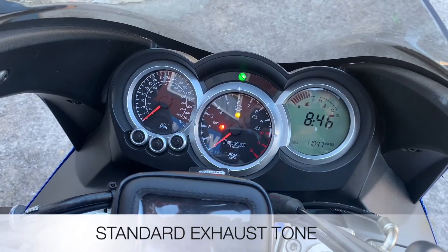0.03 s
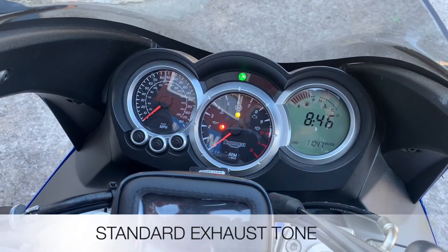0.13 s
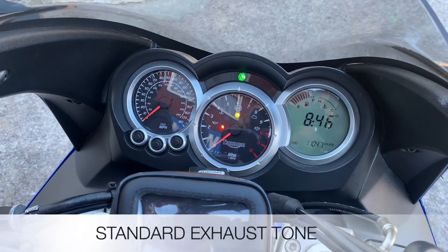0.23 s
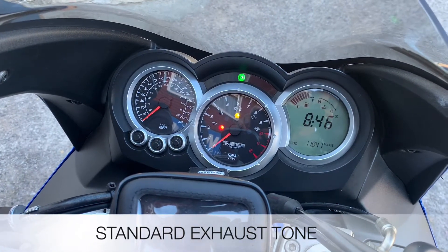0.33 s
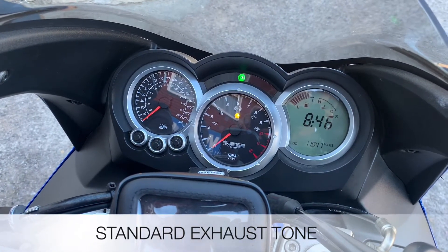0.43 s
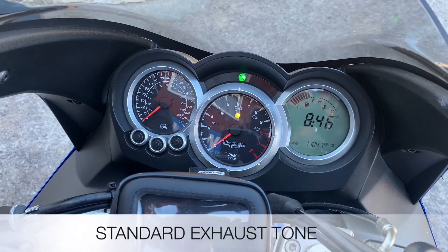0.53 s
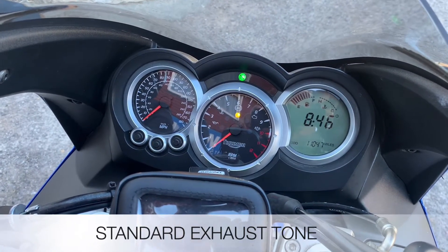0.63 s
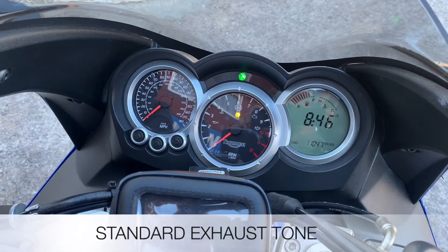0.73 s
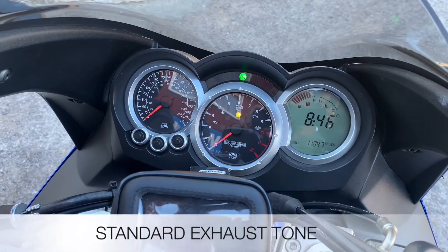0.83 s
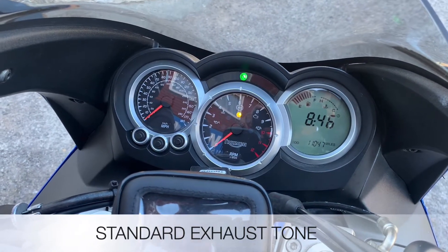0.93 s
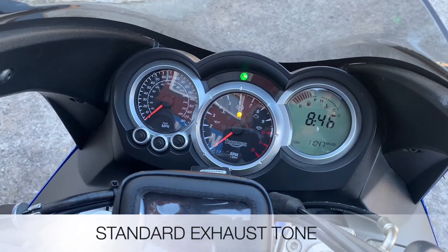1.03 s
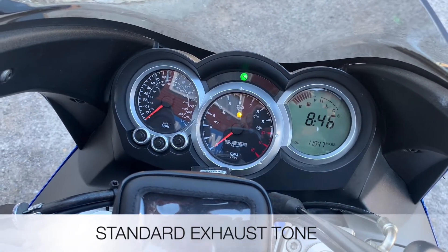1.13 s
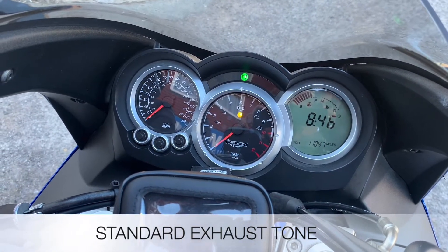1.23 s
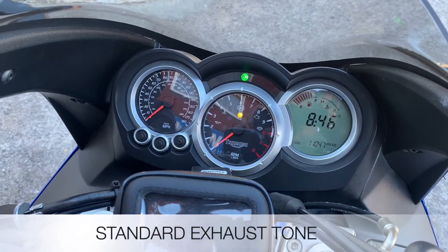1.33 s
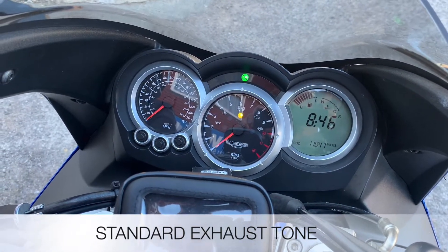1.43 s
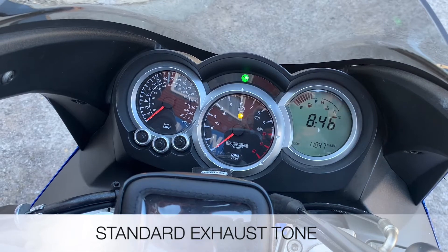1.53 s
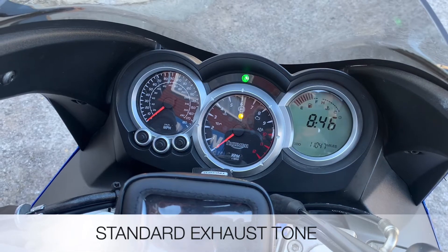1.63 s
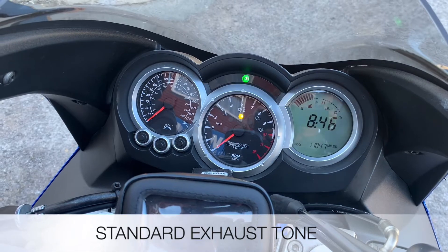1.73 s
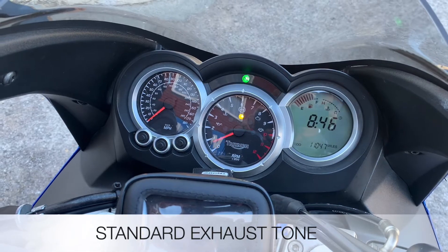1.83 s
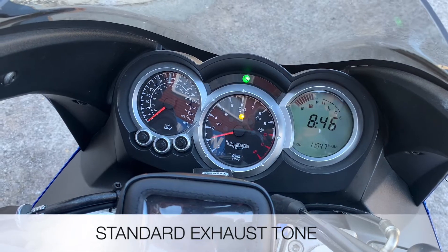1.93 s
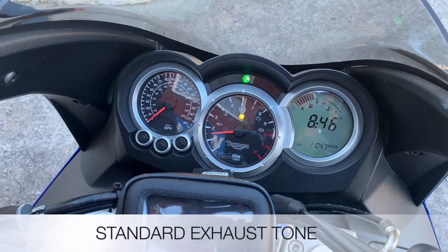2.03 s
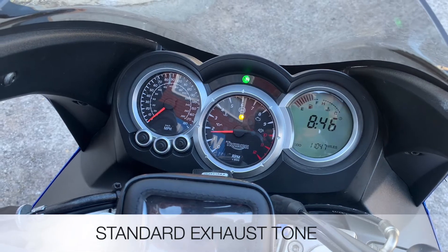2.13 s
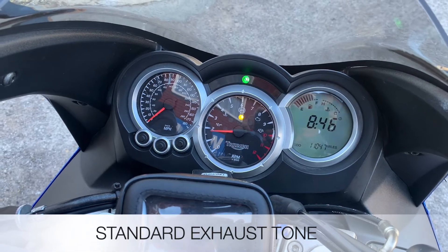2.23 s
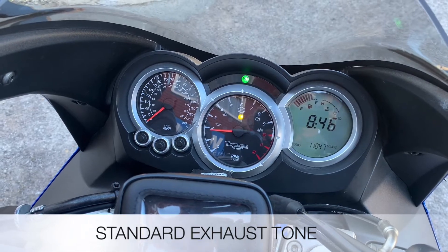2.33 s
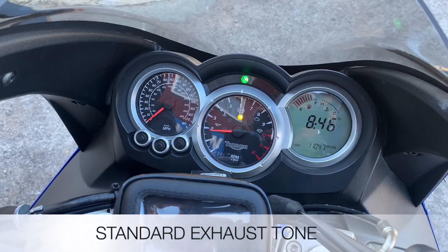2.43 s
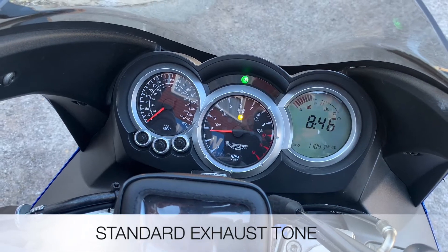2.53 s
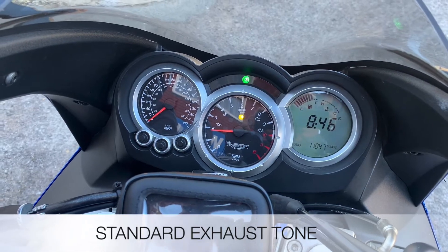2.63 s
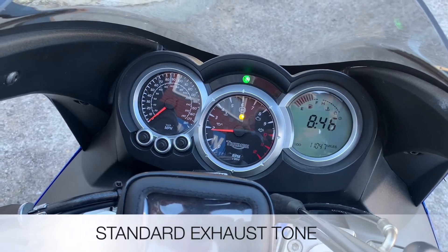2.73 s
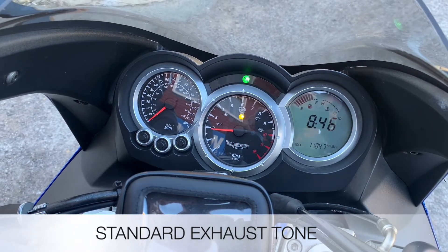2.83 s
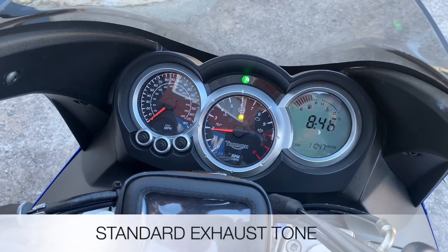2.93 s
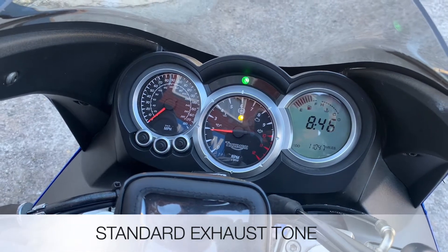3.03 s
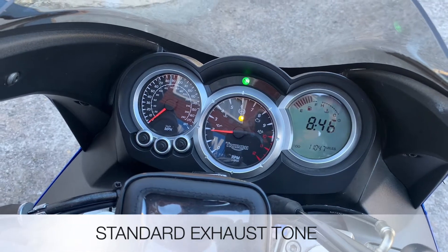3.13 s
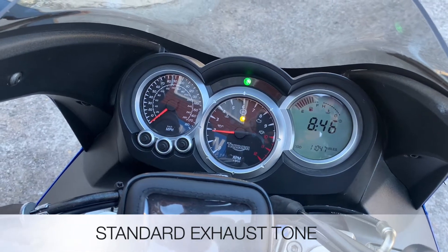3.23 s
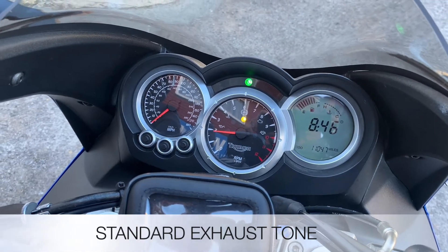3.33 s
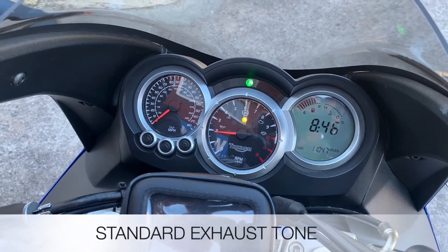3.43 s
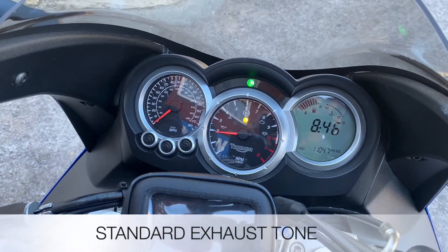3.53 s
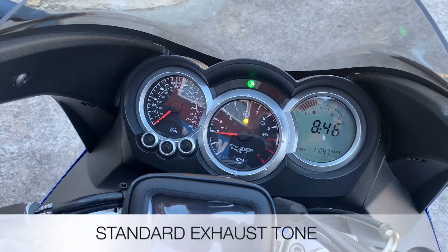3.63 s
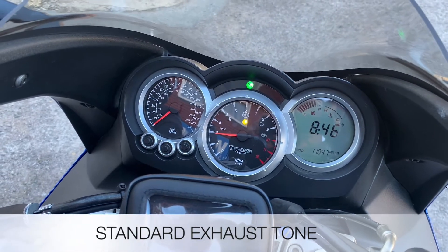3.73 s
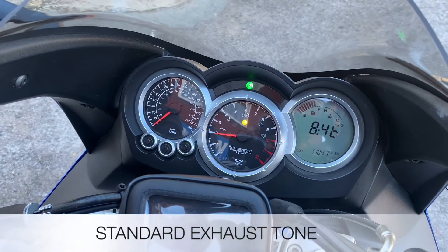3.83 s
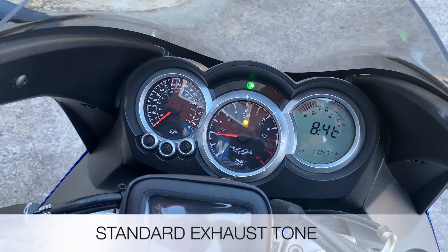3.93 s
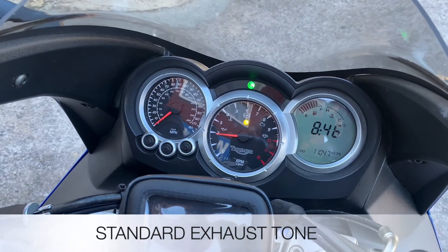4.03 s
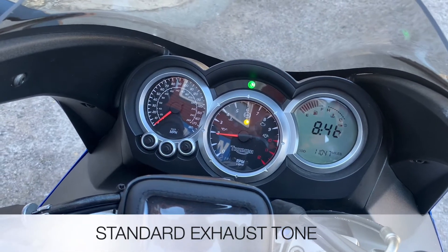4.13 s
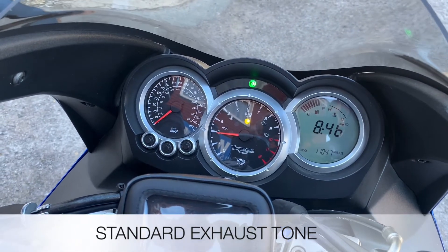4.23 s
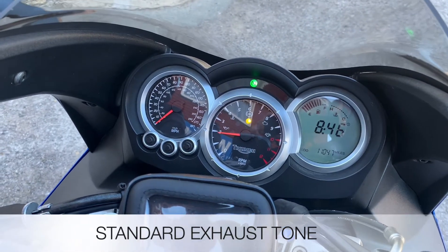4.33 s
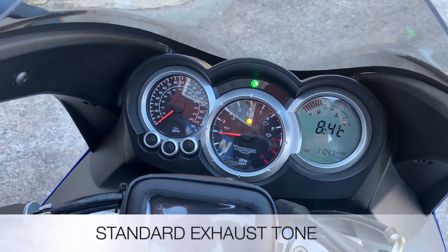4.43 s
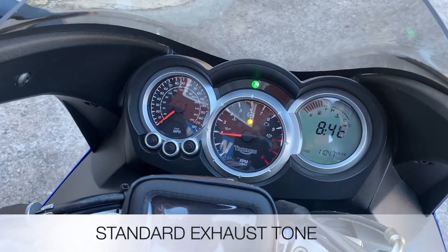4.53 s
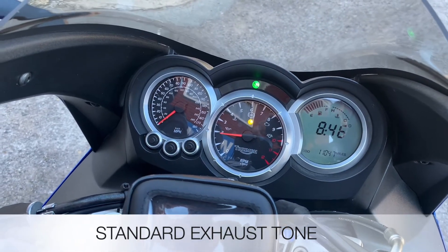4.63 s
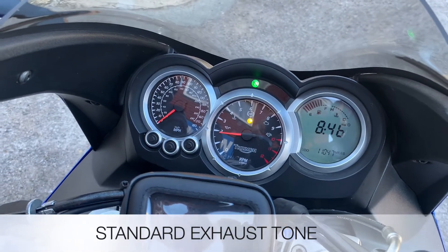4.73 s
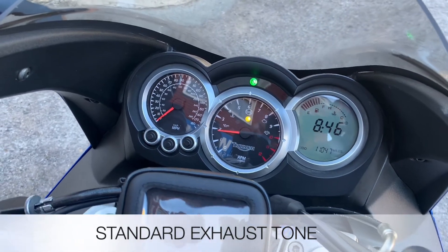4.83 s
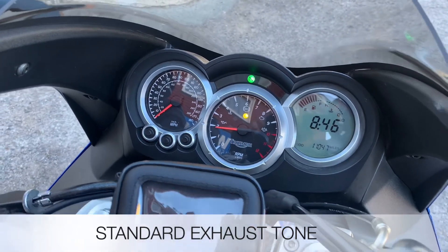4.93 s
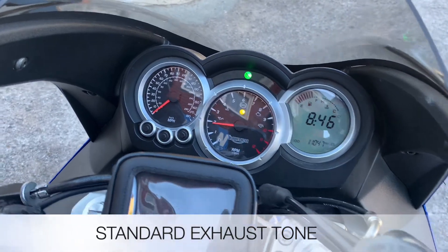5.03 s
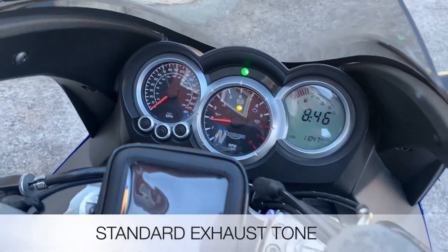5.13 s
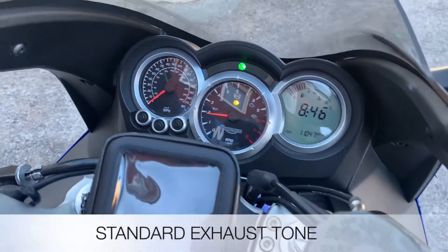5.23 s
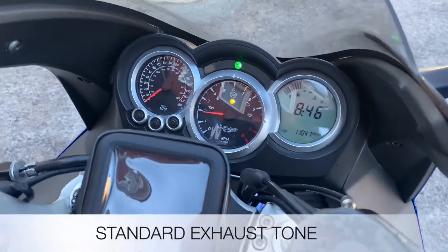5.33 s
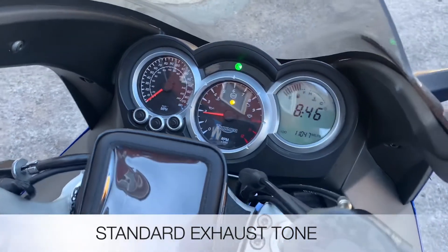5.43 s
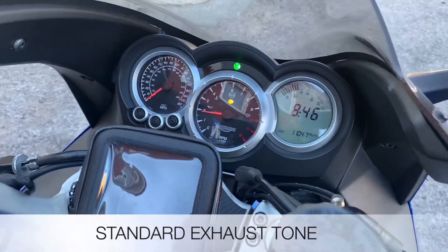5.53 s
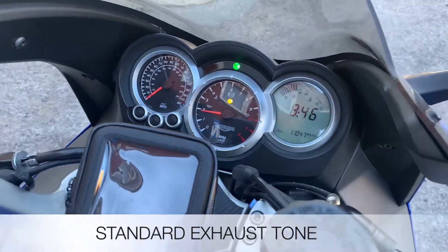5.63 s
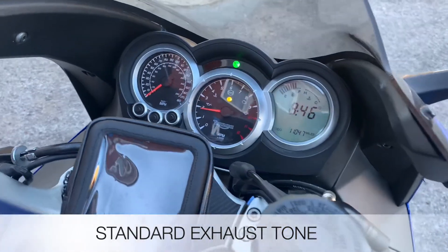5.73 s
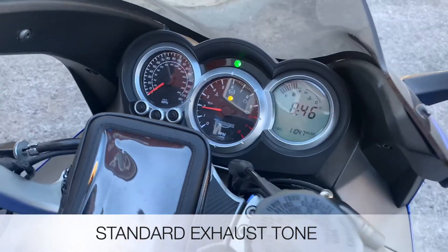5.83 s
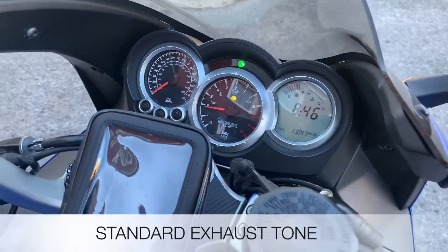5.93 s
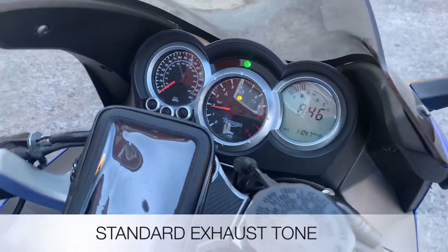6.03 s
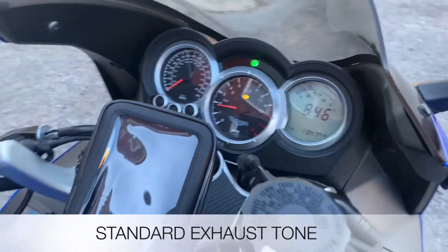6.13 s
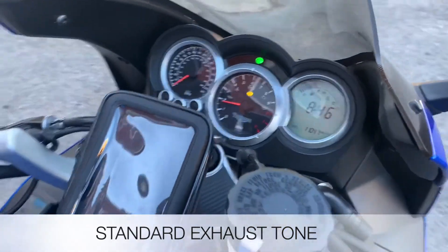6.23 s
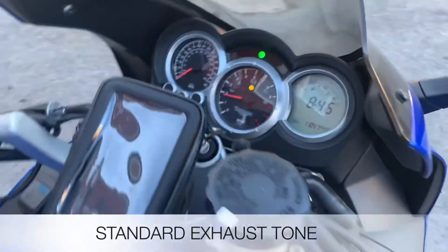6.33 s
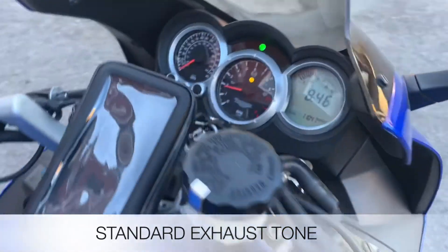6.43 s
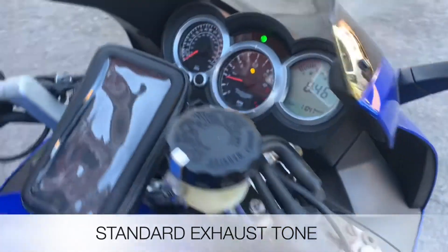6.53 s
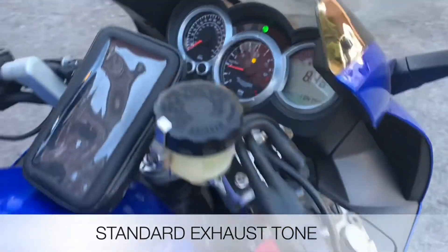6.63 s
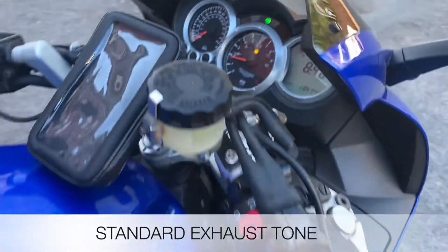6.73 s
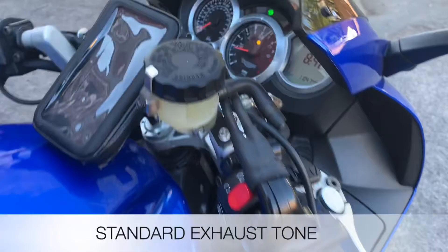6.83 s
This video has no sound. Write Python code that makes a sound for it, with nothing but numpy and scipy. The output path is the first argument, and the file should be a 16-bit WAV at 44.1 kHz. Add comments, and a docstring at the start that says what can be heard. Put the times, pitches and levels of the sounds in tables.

```python
"""A whining starter is heard first, clashing after every compression of a three-cylinder motorcycle engine.
The engine catches with a few booms and settles to a fast, slowly sinking idle, heard above the handlebars.
Impulses and tooth tones locked to the four-stroke cycle excite resonances and filtered noise: exhaust beats,
intake thump, whirring gears and valve clatter. The starter's tones and noise follow its own compressions."""
import sys
import numpy as np
from scipy import signal
from scipy.fft import rfft, irfft, next_fast_len
from scipy.io import wavfile
from scipy.ndimage import uniform_filter1d, map_coordinates

SR = 44100
rng = np.random.default_rng(int(sys.argv[2]) if len(sys.argv) > 2 else 0)


def dump(signal):
    """Clip the signal to [-1, 1] and save it as 16-bit WAV at the path in sys.argv[1]."""
    limited = np.clip(np.atleast_2d(signal).T, -1, 1)
    pcm = np.round(limited * 32767).astype(np.int16)
    wavfile.write(sys.argv[1], SR, pcm)


N = 302967  # samples

# Crankshaft speed: run-up, then a hunting, sinking idle. Each row: time in seconds, speed in rpm.
CRANK_SPEED = [(1.549, 795), (1.84, 1778), (1.98, 1794), (2.15, 1902), (2.25, 1786), (2.52, 1794),
               (2.72, 1940), (2.95, 1862), (3.33, 1842), (3.43, 1889), (4.42, 1857), (4.55, 1781),
               (4.67, 1862), (4.93, 1789), (5.41, 1844), (5.89, 1708), (6.33, 1731), (6.87, 1636)]
# Moment of catching (s) and place in the cycle at that moment (0-1); speed at which level changes are zero.
CATCH_S, CATCH_PLACE, IDLE_RPM = 1.549, .3, 1850
# Effort is the speed above its average over this span (s), limited to so many hundreds of rpm.
EFFORT_SPAN_S, MAX_EFFORT = 0.44, 0.82
# The listener leans back from the engine towards the silencer: start and length (s).
LEAN_S, LEAN_LENGTH_S = 4.86, 1

# Cylinders. Each row: place in the cycle 0-1, relative exhaust strength in dB, relative intake strength in dB.
CYLINDERS = [(0.98, -1, -5), (.318, -1.5, 9), (.651, -1.5, -2)]
# Colour of the exhaust pipe. Each row: frequency in Hz, gain in dB.
PIPE_COLOUR = [(22, -84), (31, -35), (40, -4), (47, 0), (65, 23.5), (90, 9.5), (135, 9.5), (180, -5.5),
               (230, -10), (300, 8), (600, -74)]
# Colour of the exhaust's bark. Each row: frequency in Hz, gain in dB.
BARK_COLOUR = [(60, -28), (130, 0.5), (215, 4), (300, 2.5), (385, -13), (480, -6.5), (600, -37.5),
               (1200, -56.5)]
# Colour of the gas rushing behind each firing. Each row: frequency in Hz, gain in dB.
RUSH_COLOUR = [(30, -44), (60, 7.5), (110, -9.5), (150, 8), (230, -5), (290, -5.5), (420, -1.5), (560, -17),
               (1500, -44.5)]
# Resonances of the ringing tailpipe. Each row: frequency in Hz, width in Hz, gain in dB.
TAILPIPE_MODES = [(290, 23, -3), (375.5, 7.9, -2)]
# Rich first firings that boom in the silencer. Each row: time in seconds, strength in dB;
# the highest strength also sets the peak of the whole series.
BOOMS = [(1.553, -14), (1.601, -12), (1.641, -6), (1.672, -10.5), (1.704, -21), (1.733, -23), (1.759, -8),
         (1.786, -29)]
# Resonances of the silencer. Each row: frequency in Hz, width in Hz, gain in dB.
SILENCER_MODES = [(60.8, 6, 0), (190, 79, -11.5)]
# Resonance of the droning pipe. Each row: frequency in Hz, width in Hz, gain in dB.
DRONE_MODES = [(134, 18, 0)]
# Exhaust levels before effort, lean and run-up (dB).
EXHAUST_DB, BARK_DB, RUSH_DB, TAILPIPE_DB = -21.5, -27.5, -30, -40
# Change with effort (dB per 100 rpm); the bark's serves the tailpipe too, the exhaust's also the rush.
EFFORT_EXHAUST_DB, EFFORT_BARK_DB, EFFORT_RUSH_DB = -1, 4.5, 6.5
# Change on leaning back (dB); the exhaust's serves the rush too.
LEAN_EXHAUST_DB, LEAN_BARK_DB, LEAN_TAILPIPE_DB = 2, 4.5, 12.5
# The regular beat grows during the run-up: length (s), depth below at the start (dB); swell of the booms (s).
RUN_UP_S, RUN_UP_DB, BOOM_RISE_S = .3, 7, .003
# The pipe drones while the mixture stays rich: level (dB), swell and start of the fall after the catch (s).
DRONE_DB, DRONE_SWELL_S, DRONE_HOLD_S, DRONE_FALL_DB_PER_S = -27, 0.22, 1.27, 56

# Gear meshes. Each row: tooth contacts per cycle, relative level in dB, place of greatest load in the cycle 0-1,
# swing of load in dB, change on leaning back in dB.
GEAR_MESHES = [(121, -25, .235, 7.5, 3.5), (94, -26.5, .42, 9, -2), (186, -37, .32, 10, 1),
               (242, -46, .3, 9, -1), (281, -41, .32, 10, 0), (82, -38, .1, 2, -4),
               (75.5, -34.5, .2, 2, -9)]
# Resonances of the covers. Each row: frequency in Hz, width in Hz, gain in dB.
COVER_MODES = [(1160, 50, -4), (1425, 150, 1), (1820, 220, 1), (2780, 360, 0), (3650, 250, -2),
               (4220, 400, 0)]
# Gear play closing with a knock. Each row: place in the cycle 0-1, relative strength in dB.
BACKLASH = [(.26, -3), (.645, 0), (.95, -7)]
# Cover resonance rung by the knock. Each row: frequency in Hz, width in Hz, gain in dB.
KNOCK_MODES = [(1813, 34, 0)]
# Levels before speed and lean (dB), speed dependence, lean of all the gears, then the pump's own lean (dB).
GEARS_DB, KNOCK_DB, PUMP_DB = -25.5, -35, -45
GEARS_DB_PER_OCT, LEAN_GEARS_DB, LEAN_PUMP_DB = 8, -3.5, -3
PUMP_BEATS = 42  # oil pump beats per cycle

# Valve seatings. Each row: place in the cycle 0-1, relative strength in dB.
VALVE_SEATINGS = [(.0, 0), (.15, 3), (.28, 0.5), (.46, 3), (.635, -2), (.725, 1), (.82, -1), (0.939, 2)]
# Resonances of crankcase and covers. Each row: frequency in Hz, width in Hz, gain in dB.
CASING_MODES = [(636, 11, -12), (832, 19.5, 0), (910, 23, -6.5), (1045.7, 13, 2), (1150, 6.2, 3),
                (1275, 9.2, 8.5), (1366, 13.4, 8), (1441, 53, -3), (1570, 28, -8), (1923, 17, 4),
                (2201, 18, -4), (2400, 14, -6), (2780, 33, -9), (3700, 28, -6), (4370, 35, -15),
                (4610, 130, -34), (5330, 21, -17)]
# Colour of valve and chain clatter. Each row: frequency in Hz, gain in dB.
CLATTER_COLOUR = [(150, 4), (450, -5.5), (620, -1.5), (730, -9), (1100, -1.5), (1450, 3.5), (1900, 1),
                  (2250, -6.5), (2800, -4), (3430, -10), (4400, -8.5), (7100, -21), (9300, -14),
                  (11500, -34.5), (13200, -24.5), (15500, -36)]
# Cam chain slaps, one a crank turn. Each row: place in the cycle 0-1, relative strength in dB.
CHAIN_SLAPS = [(.265, 0), (.805, -1.5)]
# Resonances of the head rung by the slaps. Each row: frequency in Hz, width in Hz, gain in dB.
HEAD_MODES = [(2850, 48, 0), (3680, 70, -13), (4290, 75, -5.5)]
# Opening clicks of the injectors. Each row: place in the cycle 0-1, relative strength in dB.
INJECTOR_TICKS = [(.155, -10.5), (0.468, -0.5), (.815, -6)]
# Resonances of the injector bodies. Each row: frequency in Hz, width in Hz, gain in dB.
INJECTOR_MODES = [(8300, 200, -6), (9250, 150, 0), (10200, 170, -2), (13000, 160, -1.5), (14300, 220, -6)]
# Levels before speed, lean and the rise after the catch (dB), then changes on leaning back (dB).
RING_DB, CLATTER_DB, SLAP_DB, TICKS_DB = -31, -26, -37.5, -43
LEAN_RING_DB, LEAN_SLAP_DB = -2.5, -8
TICK_DETUNE = .035  # no two ticks ring quite alike: share of the pitch
# Whole valve train: change per doubling of speed (dB), rise after the catch (s) from this far below (dB).
CLATTER_DB_PER_OCT, CLATTER_RISE_S, CLATTER_RISE_DB = -2, .28, 4.5

# Resonances of the airbox. Each row: frequency in Hz, width in Hz, gain in dB.
AIRBOX_MODES = [(150, 60, -6.5), (185.2, 47, 2), (220, 50.3, 1), (439, 170, -20.5)]
# Intake level at IDLE_RPM (dB), change per doubling of speed and on leaning back (dB).
INTAKE_DB, INTAKE_DB_PER_OCT, LEAN_INTAKE_DB = -27, 10, -1

# Starter drive clashes, one after each compression. Each row: time in seconds, relative strength in dB.
CLASHES = [(0.099, -11), (0.246, -10.5), (0.405, -10), (0.555, -10.5), (0.699, -10.5), (0.851, -10),
           (0.996, -11), (1.141, -10.5), (1.292, -11), (1.436, -10)]
# Rebounds of each clash. Each row: mean delay after it in seconds, mean strength relative to it in dB.
REBOUNDS = [(.007, -6), (.015, -2.5), (0.027, -8.5), (.045, -11)]
# Starter through one compression. Each row: share of the way from clash to clash, mean gear pitch in Hz,
# mean whine level in dB, rattle level in dB.
STARTER_STROKE = [(0, 500, -42, -25), (.1, 468, -36, -27), (.25, 490, -43, -29), (.38, 470, -43, -32),
                  (.46, 481, -35, -32), (.58, 525, -48, -37), (.66, 545, -38, -39), (.72, 560, -29, -40),
                  (.79, 590, -41, -41), (.92, 560, -39, -39), (1, 500, -42, -31)]
# Overtones of the starter gear. Each row: multiple of the gear pitch, relative level in dB.
STARTER_TONES = [(1, 11), (2, -14), (3, 0), (4, -7)]
# Resonances of the starter housing. Each row: frequency in Hz, width in Hz, gain in dB.
HOUSING_MODES = [(311.6, 5.1, 2), (418, 4.9, -1), (585, 47, -16.5), (805, 11.3, 4.5), (879, 26.7, 4),
                 (1011, 65, 2.5), (1455, 87, -5.5), (1652, 51, -2.5), (1878, 50, 0), (2500, 36, -2),
                 (2900, 150, -26)]
# Colour of the starter's scrape. Each row: frequency in Hz, gain in dB.
SCRAPE_COLOUR = [(200, -29), (900, -2), (2400, -3), (3500, -13), (5000, -17.5), (7000, -23), (9000, -19),
                 (11000, -33), (15000, -40)]
# Colour of the air pumped while cranking. Each row: frequency in Hz, gain in dB.
CRANK_AIR_COLOUR = [(22, -31), (40, -5), (58, 1), (80, -5), (110, -7), (140, -10), (300, -9.5),
                    (600, -14.5), (1500, -24.5), (5000, -34), (15000, -57)]
# Silencer resonance of each unfired chuff. Each row: frequency in Hz, width in Hz, gain in dB.
CHUFF_MODES = [(57.4, 2.9, 0)]
# Grinds as the motor slows after each clash. Each row: start after the clash in seconds, length in seconds,
# mean start pitch in Hz, mean end pitch in Hz, mean level in dB.
GRINDS = [(-.001, .014, 1060, 930, -18), (.009, .02, 930, 820, -18.5), (-.001, .019, 2010, 1730, -21.5),
          (.006, .016, 1500, 1400, -26), (.025, .026, 1020, 1040, -24), (.03, .058, 900, 820, -28)]
CLASH_DB, CHUFF_DB = -38, -44.5  # levels before the ear gains
GRIND_ATTACK, GRIND_SCATTER = .22, .018  # share of the length, share of the pitch
# Starter drive thrown clear as the engine catches. Each row: time in seconds, relative strength in dB.
RELEASE_CLACKS = [(1.534, -36), (1.560, -28), (1.607, -33)]
RELEASE_T60 = .09  # s

# Loose parts rattling as the idle sinks. Each row: start in seconds, length in seconds, pitch in Hz, level in dB.
RATTLES = [(4.805, 0.55, 3940, -45), (5.05, 0.35, 2240, -38), (5.42, 0.23, 4140, -43),
           (5.93, 0.69, 2430, -37), (6.364, 0.22, 4000, -35), (6.361, 0.54, 2610, -55)]
# Jolts that shake them. Each row: place in the cycle 0-1, relative strength in dB.
SHAKES = [(.29, 0), (.37, -3), (.5, -5), (.79, 0), (.87, -3), (.02, -5)]
RATTLE_WIDTH_HZ = 85
TOP_HZ = 15800  # upper limit of the microphone


def amp(db):
    """Amplitude ratio is ten to the power of decibels over twenty."""
    return 10 ** (np.asarray(db) / 20)


def unit(x):
    """Mean-square power normalisation gives rms 1."""
    return x / np.sqrt(np.mean(x ** 2) + 1e-20)


def curves(rows, at):
    """Linear interpolation reads each column after the first at the given places."""
    places, *columns = np.transpose(rows)
    return [np.interp(at, places, column) for column in columns]


def wobble(rate):
    """Spline interpolation of random knots, rate a second, gives a smooth fluctuation."""
    knots = rng.standard_normal(int(N * rate / SR) + 4)
    return map_coordinates(knots, [np.arange(N) * rate / SR])


def convolve(x, ring):
    """Linear superposition: every sample of x sets off the ring."""
    return signal.fftconvolve(np.atleast_2d(x), np.atleast_2d(ring), axes=1)[:, :N]


def coloured(x, points, size=8192):
    """Minimum-phase filtering: folding the cepstrum makes the (Hz, dB) curve causal."""
    hz, db = np.transpose(points)
    bins = np.fft.rfftfreq(size, 1 / SR)
    gain = amp(np.interp(np.log(bins + 1), np.log(hz), db))
    cepstrum = irfft(np.log(gain))
    cepstrum[1:size // 2] *= 2
    cepstrum[size // 2 + 1:] = 0
    return convolve(x, irfft(np.exp(rfft(cepstrum))))


def resonate(x, modes, size=16384):
    """Modal superposition: second-order (Hz, width, dB) resonances add with alternating sign."""
    f = np.fft.rfftfreq(size, 1 / SR)
    response = 0
    for k, (centre, width, db) in enumerate(modes):
        damping = 1j * f * width
        response = response + (-1) ** k * amp(db) * damping / (centre * centre - f * f + damping)
    return convolve(x, irfft(response))


def blows(cycle, rows, scatter_db, slop=0):
    """Periodic impact: the cycle sets off an impulse at each (place, dB) row, scattered by slop cycles."""
    out = np.zeros(N)
    for place, db in rows:
        at = np.flatnonzero(np.diff(np.floor(cycle - place)) > 0)
        size, late = rng.standard_normal((256, 2))[:len(at)].T
        at = np.minimum(np.searchsorted(cycle, cycle[at + 1] + slop * late), N - 1)
        out[at] += amp(db + scatter_db * size) * (at > 0)
    return out


def bursts(hits, t60):
    """Exponential decay of energy: every hit sets off stereo noise falling 60 dB in t60 seconds."""
    decay = amp(-120 * np.arange(SR // 4) / SR / t60)
    energy = convolve(hits ** 2, decay)
    return np.sqrt(np.abs(energy)) * rng.standard_normal((2, N))


def struck(hits, modes, scatter_db, apart, detune=0, attack=0.0006):
    """Free vibration: each hit rings damped modes in its own proportions, with ear phases apart (radians)."""
    t = np.arange(SR // 8) / SR
    hz, width, db = np.transpose(modes)
    rings = np.exp(np.outer(2j * np.pi * hz - np.pi * width, t)) * (1 - np.exp(-t / attack))
    out = np.zeros((2, N + len(t)))
    draws = rng.standard_normal((1024, 4, len(hz)))
    for at, (size, turn, ears, bend) in zip(np.flatnonzero(hits), draws):
        phase = np.pi * turn + apart * np.array([ears, -ears]) / 2
        weights = width * amp(db + scatter_db * size) * np.exp(1j * phase)
        tuned = rings
        if detune:
            tuned = rings * np.exp(np.outer(2j * np.pi * hz * detune * bend, t))
        out[:, at:at + len(t)] += hits[at] * (weights @ tuned).real
    return unit(out[:, :N])


def widen(pair, side_db):
    """Mid-side mixing turns two channels into a partly alike left and right, rms 1."""
    return unit(pair[0] + amp(side_db) * np.array([pair[1], -pair[1]]))


def bodywork(x, t60, wet_db):
    """Diffuse reflection between engine, fairing and ground decays separately for each ear."""
    t = np.arange(SR // 3) / SR
    tail = rng.standard_normal((2, len(t))) * amp(-60 * t / t60)
    return x + amp(wet_db) * convolve(x, tail / np.linalg.norm(tail[0]))


def exhaust(t, cycle, effort, lean):
    """Pulsed flow excites pipe resonances: firings beat, bark and rush, and the first ones boom and drone."""
    firings = blows(cycle, [(place, db) for place, db, _ in CYLINDERS], scatter_db=.8)
    swell_db = EFFORT_EXHAUST_DB * effort + LEAN_EXHAUST_DB * lean
    beat = amp(swell_db + EXHAUST_DB) * unit(coloured(firings, PIPE_COLOUR))
    # a sharp suction follows each push as the wave turns at the open end
    suction = -unit(np.roll(firings, round(0.00447 * SR)))
    puffs = suction + amp(-14) * unit(bursts(firings, t60=.06))
    bark_db = BARK_DB + EFFORT_BARK_DB * effort + LEAN_BARK_DB * lean
    bark = amp(bark_db) * unit(coloured(puffs[0], BARK_COLOUR))
    gas = coloured(bursts(firings, t60=0.085), RUSH_COLOUR)
    rush = amp(RUSH_DB + swell_db + EFFORT_RUSH_DB * effort) * widen(gas, side_db=-13)
    tailpipe_db = TAILPIPE_DB + EFFORT_BARK_DB * effort + LEAN_TAILPIPE_DB * lean
    tailpipe = amp(tailpipe_db) * unit(resonate(puffs[0], TAILPIPE_MODES))

    age = t - CATCH_S
    s, db = np.transpose(BOOMS)
    boom_hits = np.bincount(np.round(s * SR).astype(int), amp(db), N)
    boom = -resonate(boom_hits, SILENCER_MODES)
    boom = uniform_filter1d(boom, round(BOOM_RISE_S * SR))
    boom *= amp(db.max()) / np.abs(boom).max()
    drone_db = DRONE_DB - DRONE_FALL_DB_PER_S * np.maximum(age - DRONE_HOLD_S, 0)
    drone_swell = np.clip(age / DRONE_SWELL_S, 0, 1)
    drone = amp(drone_db) * drone_swell * unit(resonate(firings, DRONE_MODES))
    build = amp(np.interp(age, [0, RUN_UP_S], [-RUN_UP_DB, 0]))
    return build * (beat + bark + rush + tailpipe) + boom + drone


def gears(cycle, octaves, lean):
    """Tooth meshing: phase- and load-modulated tones ring the covers, with knocks of play and a pump's song."""
    # the uneven crank makes the angle waver
    uneven = .0008 * np.sin(2 * np.pi * 3 * cycle) + .0012 * np.sin(2 * np.pi * 2 * cycle)
    angle = cycle + uneven + .0022 * wobble(22)
    # the teeth chatter more while the crank is slow
    chatter = .33 - 1.3 * np.minimum(octaves, 0)
    teeth_sum = np.zeros(N)
    for teeth, db, place, swing_db, lean_db in GEAR_MESHES:
        # the load swells once a crank turn, twice a cycle
        load = amp(swing_db * np.cos(4 * np.pi * (cycle - place)) + 1.8 * wobble(90))
        tone = np.sin(2 * np.pi * teeth * angle + chatter * wobble(170))
        teeth_sum += amp(db + lean_db * lean) * unit(load * tone)
    covered = resonate(teeth_sum, COVER_MODES)[0]
    # reflections off the fairing arrive from the sides
    reflected = unit(bodywork(covered, t60=.025, wet_db=20)[0])
    whirr = amp(GEARS_DB) * widen([unit(covered), reflected], side_db=-12.0)
    pump_db = PUMP_DB + LEAN_PUMP_DB * lean + 3 * wobble(30)
    pump = amp(pump_db) * unit(np.sin(2 * np.pi * PUMP_BEATS * angle))
    play = blows(cycle, BACKLASH, scatter_db=1.2)
    knock = amp(KNOCK_DB) * unit(resonate(play, KNOCK_MODES))
    return amp(GEARS_DB_PER_OCT * octaves + LEAN_GEARS_DB * lean) * (whirr + knock + pump)


def valve_train(t, cycle, octaves, lean):
    """Impact excitation: valves ring the casing and clatter, the chain hisses and slaps, injectors tick."""
    seats = blows(cycle, VALVE_SEATINGS, scatter_db=1.8, slop=.018)
    ring = amp(RING_DB + LEAN_RING_DB * lean) * struck(seats, CASING_MODES, scatter_db=3.3, apart=1.2)
    # each slap sets the links chattering against the head
    slaps = blows(cycle, CHAIN_SLAPS, scatter_db=1.5, slop=.012)
    head = struck(slaps, HEAD_MODES, scatter_db=2, apart=1, detune=.01, attack=.002)
    head = head + unit(resonate(bursts(slaps, t60=.09), HEAD_MODES))
    slap = amp(SLAP_DB + LEAN_SLAP_DB * lean) * unit(head)
    rattle = unit(bodywork(seats, t60=.08, wet_db=40))
    chain = unit(rng.standard_normal((2, N)) * amp(2.5 * wobble(330)))
    knocks = rattle + amp(-7) * unit(bursts(seats, t60=.06)) + amp(-1) * chain
    clatter = amp(CLATTER_DB) * widen(coloured(knocks, CLATTER_COLOUR), side_db=-2.5)
    # each injector clicks open, then shut
    closings = [(place + .03, db - 1) for place, db in INJECTOR_TICKS]
    needles = blows(cycle, list(INJECTOR_TICKS) + closings, scatter_db=2, slop=.009)
    rings = struck(needles, INJECTOR_MODES, scatter_db=2.5, apart=.5, detune=TICK_DETUNE, attack=.0015)
    ticks = amp(TICKS_DB) * unit(bodywork(rings, t60=.045, wet_db=0))
    rise_db = np.interp(t - CATCH_S, [0, CLATTER_RISE_S], [-CLATTER_RISE_DB, 0])
    ear_gain = amp([[-.8], [.8]])
    return amp(CLATTER_DB_PER_OCT * octaves + rise_db) * ((ring + slap + clatter) * ear_gain + ticks)


def intake(cycle, octaves, lean):
    """Cavity resonance: the cylinders' uneven gulps excite the airbox."""
    gulps = blows(cycle, [(place + .23, db) for place, _, db in CYLINDERS], scatter_db=.8)
    level_db = INTAKE_DB + INTAKE_DB_PER_OCT * octaves + LEAN_INTAKE_DB * lean
    return -amp(level_db) * unit(resonate(gulps, AIRBOX_MODES))


def starter(t):
    """Load modulation bends the gear tones through each compression; clashes then ring the housing."""
    s, db = np.transpose(CLASHES)
    gap = np.mean(np.diff(s))
    stroke = np.interp(t, np.r_[s[0] - gap, s, s[-1] + gap], np.arange(len(s) + 2)) % 1
    pitch_hz, whine_db, rattle_db = curves(STARTER_STROKE, stroke)
    # no two compressions load the motor quite alike
    drift = 1 + .012 * wobble(8)
    turn = np.cumsum(pitch_hz * (1 + .012 * wobble(40)) * drift) / SR + .024 * wobble(260)
    teeth = sum(amp(level) * np.sin(2 * np.pi * multiple * turn) for multiple, level in STARTER_TONES)
    housed = bodywork(resonate(teeth, HOUSING_MODES), t60=.05, wet_db=-7)
    whine = amp(whine_db + 2.5 * wobble(12)) * unit(housed)
    grit = rng.standard_normal((2, N)) * amp(4 * wobble(300))
    rattle = amp(rattle_db) * widen(resonate(grit, HOUSING_MODES), side_db=-5.5)

    # each clash rebounds a few times, unevenly, through the play in the gears
    hits = np.zeros(N)
    hits[np.round((s + .002) * SR).astype(int)] = amp(db)
    for after, drop_db in REBOUNDS:
        late, size = rng.standard_normal((len(s), 2)).T
        at = np.round((s + after * (1 + .1 * late)) * SR).astype(int)
        hits[at] = amp(db + drop_db + .7 * size)
    clang = struck(hits, HOUSING_MODES, scatter_db=1.5, apart=.8, attack=.001)
    clash = amp(CLASH_DB) * unit(bodywork(clang, t60=0.07, wet_db=-4))
    early_hits = np.roll(hits, -round(0.0052 * SR))  # negative roll: the scrape leads the clash
    scrape = amp(-39.0) * widen(coloured(bursts(early_hits, t60=0.14), SCRAPE_COLOUR), side_db=0.5)
    brushes = amp(-39) * widen(coloured(rng.standard_normal((2, N)), SCRAPE_COLOUR), side_db=0.0)
    air_db = -34.5 + 2 * np.cos(2 * np.pi * (stroke - .15))
    air = amp(air_db) * widen(coloured(rng.standard_normal((2, N)), CRANK_AIR_COLOUR), side_db=-18)
    # each unfired compression chuffs from the silencer
    strokes = np.bincount(np.round(s * SR).astype(int), minlength=N)
    chuff = amp(CHUFF_DB) * unit(resonate(strokes, CHUFF_MODES))
    mix = whine + rattle + clash + grind(t) + scrape + brushes + air + chuff
    return mix * np.interp(t, [1.55, 1.6], [1, 0]) * amp([[-.7], [.7]])


def grind(t):
    """Frequency glide: rough tooth tones follow a changing meshing rate around every clash."""
    out = np.zeros(N)
    for after, length, start_hz, end_hz, level_db in GRINDS:
        chatter = .55 * wobble(450)
        for (s, _), (bend, size) in zip(CLASHES, rng.standard_normal((len(CLASHES), 2))):
            span = slice(*np.searchsorted(t, [s + after, s + after + length]))
            u = (t[span] - s - after) / length
            pitch_hz = (start_hz + (end_hz - start_hz) * u) * (1 + GRIND_SCATTER * bend)
            turn = np.cumsum(pitch_hz) / SR
            envelope = np.minimum(u / GRIND_ATTACK, 1) * np.sqrt(np.abs(1 - u))
            out[span] += amp(level_db + size) * envelope * np.sin(2 * np.pi * turn + chatter[span])
    return bodywork(out, t60=0.11, wet_db=-12)


def release():
    """Impact noise: the starter drive clacks as the engine overruns it."""
    s, db = np.transpose(RELEASE_CLACKS)
    hits = np.bincount(np.round(s * SR).astype(int), amp(db - db.max()), N)
    clacks = coloured(bursts(hits, RELEASE_T60), SCRAPE_COLOUR)
    return amp(db.max() + 14) * clacks


def loose_parts(t, cycle):
    """Forced vibration: jolts in every turn shake each loose part, whose rattle swells and dies away."""
    out = np.zeros((2, N))
    for start, length, hz, db in RATTLES:
        shakes = blows(cycle, SHAKES, scatter_db=2, slop=.02)
        swell = np.sqrt(np.abs(np.sin(np.pi * np.clip((t - start) / length, 0, 1))))
        rattle = struck(shakes, [(hz, RATTLE_WIDTH_HZ, 0)], scatter_db=-3.5, apart=0.63)
        out += amp(db) * swell * rattle
    return out


def scene():
    """Phase locking: the starter hands over to an engine whose integrated speed times its sources."""
    t = np.arange(N) / SR
    rpm, = curves(CRANK_SPEED, t)
    # one four-stroke cycle takes two turns of the crank
    cycle = CATCH_PLACE + np.cumsum(rpm * (t >= CATCH_S)) / SR / (2 * 60)
    octaves = np.log2(rpm / IDLE_RPM)
    surplus = (rpm - uniform_filter1d(rpm, round(EFFORT_SPAN_S * SR))) / 100
    effort = np.clip(surplus, -MAX_EFFORT, MAX_EFFORT)
    lean = np.clip((t - LEAN_S) / LEAN_LENGTH_S, 0, 1)
    engine = exhaust(t, cycle, effort, lean) + intake(cycle, octaves, lean)
    engine = engine + gears(cycle, octaves, lean) + valve_train(t, cycle, octaves, lean)
    engine = engine + loose_parts(t, cycle)
    onset = np.clip((t - CATCH_S) / 0.0026, 0, 1)
    return starter(t) + release() + onset * engine


def record(dry, count=3):
    """Band limiting: the left port lags by count samples; the microphone drops the deepest bass and the top."""
    ports = np.array([np.pad(dry[0], (count, 0))[:N], dry[1]])
    ports = signal.sosfilt(signal.butter(2, 27, "highpass", fs=SR, output="sos"), ports)
    size = next_fast_len(N + SR // 2)
    passed = np.fft.rfftfreq(size, 1 / SR) < TOP_HZ
    return irfft(rfft(ports, size) * passed, size)[:, :N]


dry = scene()
out = record(dry)
dump(out)
```